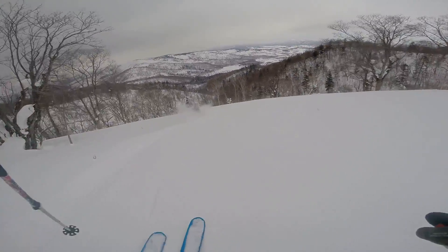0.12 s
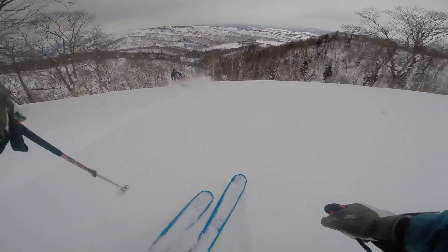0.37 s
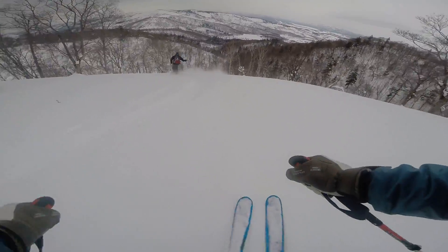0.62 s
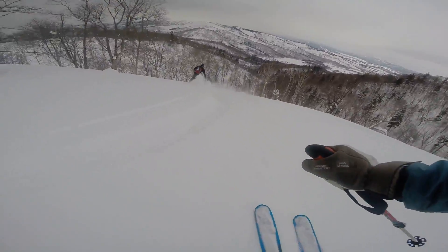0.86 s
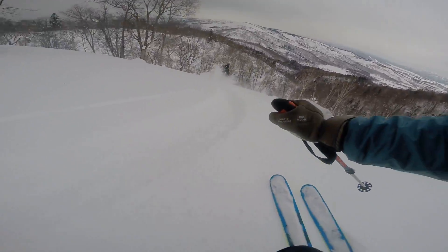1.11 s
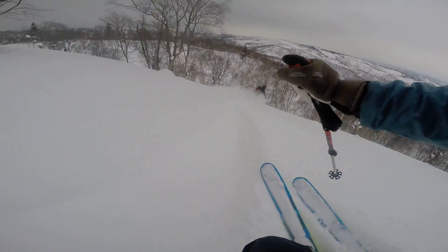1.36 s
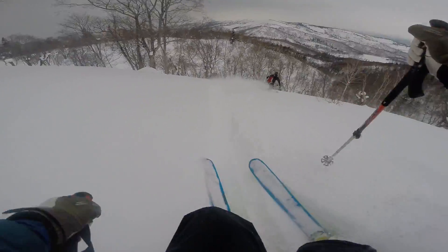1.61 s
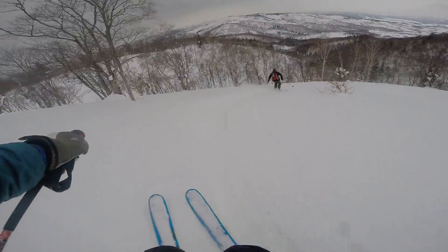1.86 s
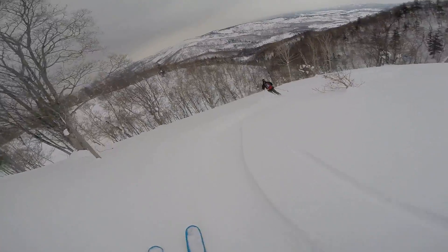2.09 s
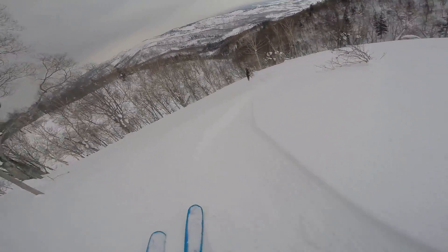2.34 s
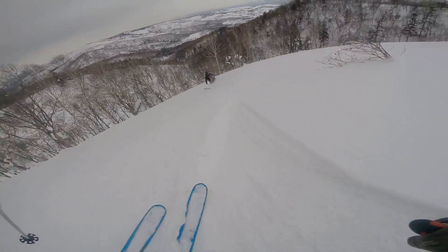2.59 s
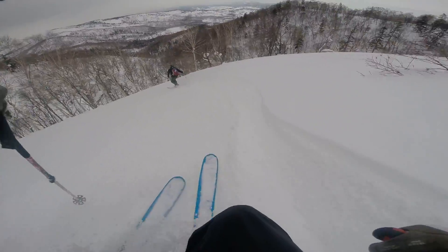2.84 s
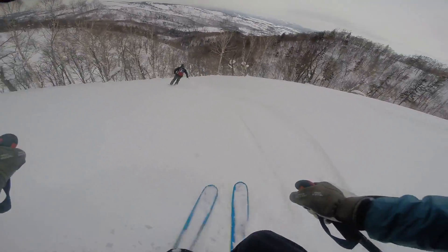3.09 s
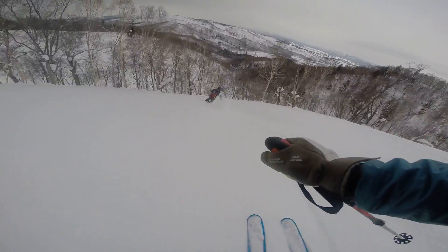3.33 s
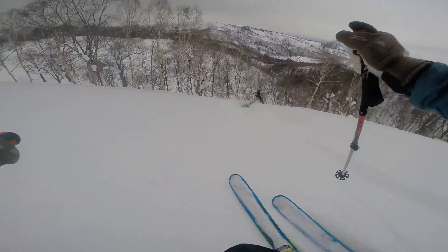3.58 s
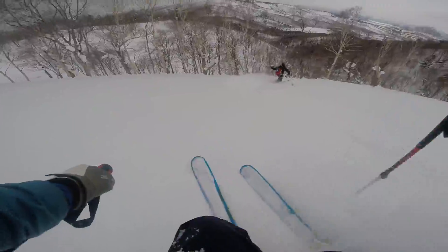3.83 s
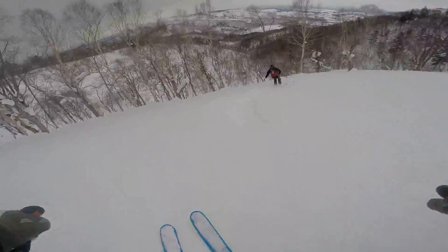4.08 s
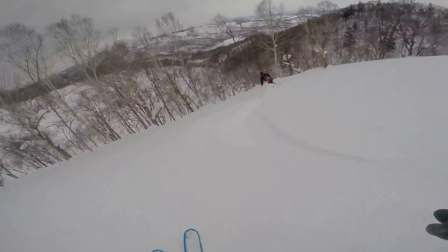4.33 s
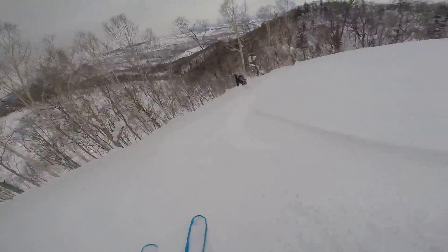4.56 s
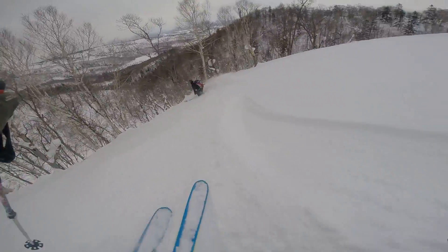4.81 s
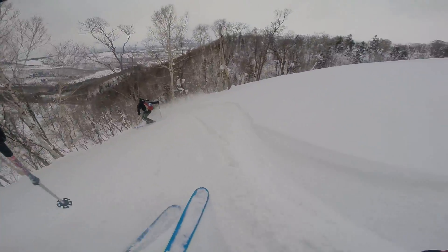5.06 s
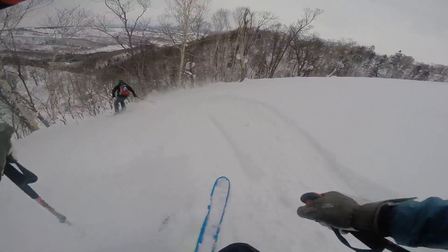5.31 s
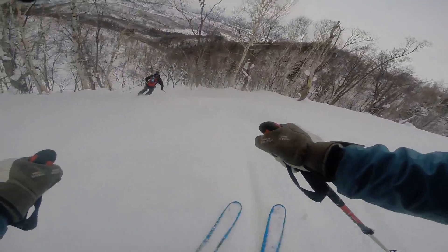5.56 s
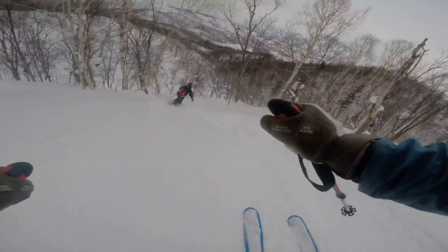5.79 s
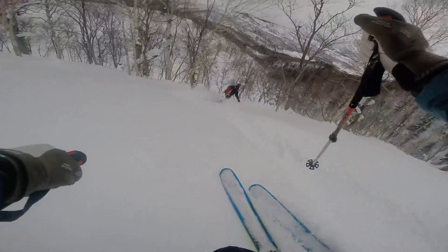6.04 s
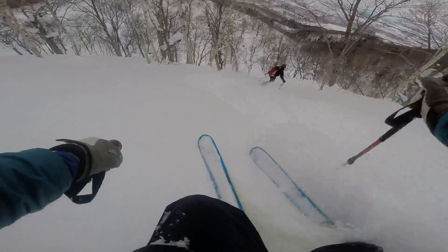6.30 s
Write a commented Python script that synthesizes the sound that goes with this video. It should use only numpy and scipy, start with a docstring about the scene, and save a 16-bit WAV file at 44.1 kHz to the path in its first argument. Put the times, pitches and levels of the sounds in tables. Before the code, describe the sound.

Muffled low wind rumbles unevenly against a closed plastic housing on a skier, over a thin, soft hiss of skis in powder. A bright tick comes at about 0.5 s with a small lurch. From 1.0 to 2.0 s airy gusts flutter past, powder sprays softly, and fine snow crystals crackle on the shell, mostly around 1.3 and 1.5 s. It is calmer from 2.3 s, with a dull thump at 2.6 and another at 3.4. A strong rushing gust swells at 3.55 and ends in a loud, hard plastic knock at 3.6, with a brief rattle. Low wind swells near 4.2, then small squeaky rubs of the mount scatter from 4.3 to 4.9. Short sharp gusts and a rub come at about 5.45, soft thumps at 5.8, and breathy gusts around 6.0 to 6.2, the wind and hiss continuing to the end at 6.4.

```python
"""Wind buffets a closed plastic housing on a skier gliding through powder snow, and rushes through its air cavity.
Wind, ski hiss and powder spray are shaped noise; the hiss and spray pass through the cavity's resonances.
Snow crystals tick on the shell as short cracks with a pitch; the mount rubs (stick-slip), thumps and lurches.
One gust ends in a hard knock: a push, decaying shell modes, a rattle and a slow swing."""
import sys
import numpy as np
from scipy import signal
from scipy.fft import rfft, irfft, next_fast_len
from scipy.io import wavfile
from scipy.ndimage import uniform_filter1d, map_coordinates

SR = 44100
rng = np.random.default_rng(int(sys.argv[2]) if len(sys.argv) > 2 else 0)


def gain_from_db(level_db):
    """Turn a decibel level (scalar or array-like) into a linear amplitude factor."""
    decades = np.asarray(level_db, float) / 20
    return 10 ** decades


def materialize(psi):
    """Save the field psi as 16-bit PCM at rate SR to the path in sys.argv[1].

    A 1-D psi becomes a single channel; in a 2-D psi each row is a channel.
    """
    bounded = np.clip(np.atleast_2d(psi).T, -1, 1)
    quanta = np.round(bounded * 32767).astype(np.int16)
    wavfile.write(sys.argv[1], SR, quanta)


N = 283061  # samples

# wind buffeting the housing: (time [s], rms [dB])
WIND = [(0.0, -31), (0.36, -37), (0.53, -32), (0.75, -34.5), (2.95, -32), (3.13, -33.5), (3.41, -35),
        (3.63, -28), (3.86, -35.5), (4.15, -21), (4.34, -39), (5.38, -33), (5.52, -43.5), (5.74, -37),
        (5.93, -27), (6.42, -35.5)]
# relative colours of buffet, rocking, flutter and rush: (frequency [Hz], density [dB per Hz])
BUFFET_COLOUR = [(8, -6.5), (20, 3), (45, -8.5), (150, -21), (500, -48.5)]
ROCKING_COLOUR = [(12, -9), (30, -0.5), (70, -2.5), (130, -10.5), (250, -29.5)]
FLUTTER_COLOUR = [(80, -9), (200, 0), (450, -7.5), (800, -14), (1300, -14), (2000, -27), (3600, -28)]
RUSH_COLOUR = [(800, -18.5), (1400, -13.5), (1900, -0.5), (2380, -0.5), (2750, -13.5), (3600, -19),
               (4200, -20)]
# hiss of the skis, louder as the edges press: (time [s], rms [dB])
GLIDE = [(0.0, -52.5), (0.18, -53), (0.52, -48.5), (0.84, -55), (1.77, -49), (2.0, -55), (2.34, -55.5),
         (2.88, -50.5), (3.34, -54.5), (3.65, -48.5), (3.98, -50.5), (4.27, -54), (5.68, -53.5),
         (5.93, -52), (6.27, -52), (6.42, -49)]
# air cavity before the microphone: (resonance [Hz], width [Hz], level [dB])
CAVITY = [(1623, 110, 2.5), (2330, 294, 3), (3540, 640, -9.5), (4610, 756, -7), (6530, 930, -11.5),
          (9500, 1620, -16)]
# gusts on the housing: (start [s], end [s], rush strength [dB], shaking over blowing [dB])
GUSTS = [(0.296, 0.433, -56, 8), (0.553, 0.601, -43.5, 2.5), (0.655, 0.783, -53.5, 7),
         (1.01, 1.067, -45.5, -1.5), (1.092, 1.148, -47, -4), (1.263, 1.387, -47, -4),
         (1.533, 1.597, -43, -10), (1.691, 1.935, -49.5, -2), (1.972, 2.017, -48, -2.5),
         (2.258, 2.329, -50.5, 3), (3.052, 3.126, -55, 7), (3.466, 3.545, -40.5, -1.5),
         (3.561, 3.621, -24.5, -3.5), (3.66, 3.9, -53.5, -0.5), (3.926, 4.046, -42.5, -3),
         (4.05, 4.176, -42.5, -6), (4.447, 4.5, -49.5, -4), (4.544, 4.572, -53.5, 11),
         (5.18, 5.262, -51, 7), (5.26, 5.36, -48, 4.5), (5.444, 5.466, -32.5, 1.5),
         (5.473, 5.497, -33, 3.5), (5.725, 5.85, -46, 1.5), (5.964, 5.99, -35, 1.5),
         (5.998, 6.027, -31, 1.5), (6.049, 6.121, -41.5, -3), (6.165, 6.232, -37.5, -6),
         (6.335, 6.418, -48.5, -10)]
# powder thrown up by the skis, striking and fading: (start [s], level [dB], t60 [s])
CLOUDS = [(0.33, -54, 0.37), (1.288, -46, 0.34), (1.537, -38.5, 0.19), (1.733, -51, 0.3), (3.597, -41, 0.1)]
# brief rubs of the mount: (start [s], ring rms [dB], pitch [Hz], length of slipping [s])
RUBS = [(0.276, -47.5, 730, 0.024), (0.66, -48, 520, 0.024), (1.107, -48, 490, 0.037),
        (1.538, -43.5, 2330, 0.043), (1.796, -48, 910, 0.0083), (2.553, -51, 714, 0.028),
        (2.957, -43, 287, 0.0081), (3.601, -32.5, 1010, 0.016), (4.293, -50, 2200, 0.015),
        (4.358, -55, 3380, 0.024), (4.444, -45, 1770, 0.012), (4.482, -43.5, 1970, 0.014),
        (4.479, -47, 885, 0.016), (4.534, -48, 510, 0.031), (4.651, -48.5, 423, 0.018),
        (4.707, -48, 2100, 0.018), (4.7, -49, 836, 0.016), (4.861, -46.5, 2190, 0.021),
        (4.872, -52, 750, 0.024), (5.285, -39.5, 1170, 0.0058), (5.303, -50.5, 1230, 0.067),
        (5.46, -33.5, 1690, 0.008)]
# snow crystals on the shell: (time [s], level [dB], pitch [Hz])
TICKS = [(0.496, -21.5, 7050), (1.257, -40, 11000), (1.264, -33, 6900), (1.2917, -30, 9600),
         (1.3, -27.5, 9000), (1.3003, -27, 5000), (1.305, -28, 11300), (1.3312, -27.5, 9050),
         (1.3366, -27.5, 5000), (1.516, -28, 2400), (1.516, -27.5, 9800), (1.5405, -25, 2300),
         (1.543, -21, 4940), (1.6188, -29, 11200), (1.735, -26.5, 6800), (1.757, -29, 7000),
         (1.8542, -33.5, 7150)]
# swings of the housing on its mount: (start [s], peak [dB], pitch [Hz], length [s])
LURCHES = [(0.521, -18, 18.5, 0.084), (1.515, -17.5, 28.5, 0.036), (1.279, -22, 45, 0.047),
           (1.359, -22, 18.5, 0.039), (3.47, -16.5, 54, 0.018), (3.5, -18.5, 75, 0.02),
           (3.761, -16.5, 22, 0.04), (4.105, -20, 65, 0.06), (6.058, -20, 60, 0.015),
           (6.092, -20.5, 46, 0.026)]
# dull pushes of the mount: (start [s], level [dB], time to zero crossing [s])
THUMPS = [(1.516, -20, 0.003), (2.64, -13, 0.0018), (3.431, -11, 0.0036), (3.707, -20, 0.0024),
          (4.22, -20, 0.0066), (5.7745, -21, 0.0015), (5.804, -17, 0.0026)]
# the hard knock: (start [s], level [dB])
KNOCK = (3.6215, -1.4)
# shell modes in the knock: (pitch [Hz], level over the push [dB], t60 [s], rise [s])
SHELL_MODES = [(438, -18, 0.058, 0.00078), (1850, 20, 0.0105, 0.0056), (2960, -1.5, 0.0081, 0.00087),
               (4470, -13, 0.0053, 0.00012)]

RISE_S, FALL_S = 0.047, 0.039
KNOCK_RISE_S = 0.063  # slower rise of the gust that ends in the knock
USUAL_GUST_DB, POWDER_DB = -44, -55.5  # strength of a usual gust, and its powder
POWDER_DB_PER_DB = 0.82  # growth with gust strength
STEADY_FLUTTER_DB, FLUTTER_DB_PER_DB = -51.5, 0.082  # in mean wind, and growth with wind
ROCKING_OVER_SHAKING_DB, ROCKING_SMOOTHING_S = 9, 0.03
ROCKING_MAX_RMS = 0.058  # the mount stops the swing
KNOCK_TOP_HZ = 6200  # the padded mount dulls the blow above this
TOP_HZ = 15600


def unit(x):
    """Scaled to rms 1."""
    return x / np.sqrt(np.mean(x ** 2) + 1e-20)


def curves(rows):
    """One value per sample for each column after the time."""
    time_s, *columns = np.transpose(rows)
    return [np.interp(np.arange(N) / SR, time_s, column) for column in columns]


def wobble(rate_hz):
    """Smooth random curve, rate_hz knots a second."""
    knots = rng.standard_normal(round(N * 2 * rate_hz / SR) + 9)
    return map_coordinates(knots, [np.arange(N) * rate_hz / SR])


def noise():
    """White noise, rms about 1."""
    return rng.standard_normal(N)


def filtered(x, response):
    """x times a real or complex response of frequency."""
    size = next_fast_len(N + 8192)
    return irfft(rfft(x, size) * response(np.fft.rfftfreq(size, 1 / SR)), size)[:N]


def coloured(x, spectrum):
    """x through (frequency [Hz], level [dB]) points read on a log axis, rms 1."""
    point_hz, point_db = np.transpose(spectrum)

    def response(hz):
        return gain_from_db(np.interp(np.log(hz + 1), np.log(point_hz), point_db, left=-80, right=-80))

    return unit(filtered(x, response))


def patchy(patch_db):
    """White noise with patches of random gain in time and frequency; patch_db is their rms."""
    bins = signal.stft(rng.standard_normal(N + 512), nperseg=512)[2]
    field = uniform_filter1d(rng.standard_normal(bins.shape), size=6, axis=0)
    field = uniform_filter1d(field, size=8, axis=1)
    return signal.istft(bins * gain_from_db(patch_db * unit(field)), nperseg=512)[1][:N]


def cavity(hz):
    """Summed resonances of the air cavity, alternating in sign, over a weak direct path."""
    response = gain_from_db(-29.0)
    for k, (centre_hz, width_hz, db) in enumerate(CAVITY):
        damping = 1j * hz * width_hz
        response = response + (-1) ** k * gain_from_db(db) * damping / (centre_hz ** 2 - hz ** 2 + damping)
    return response


def add(track, start_s, sound):
    """Mixes a short sound in at start_s."""
    track[round(start_s * SR):][:len(sound)] += sound


def ease(u):
    """Smooth step from 0 to 1."""
    return np.sin(np.pi / 2 * np.clip(u, 0, 1)) ** 2


def wind(rush_gain, flutter_gain):
    """Eddies push the housing (buffet), rock it, shake it (flutter) and blow across the cavity in lumps (rush)."""
    wind_db, = curves(WIND)
    eddies = wobble(30)
    buffet = unit(coloured(gain_from_db(2.94 * wobble(14) + 2.9 * eddies) * noise(), BUFFET_COLOUR))
    rocking = unit(coloured(gain_from_db(2.6 * eddies) * noise(), ROCKING_COLOUR))
    flutter = unit(gain_from_db(1.7 * eddies + 2.07 * wobble(90)) * coloured(patchy(2.5), FLUTTER_COLOUR))
    rush = unit(gain_from_db(0.59 * eddies + 2.57 * wobble(120)) * coloured(patchy(2.5), RUSH_COLOUR))

    shaking = uniform_filter1d(flutter_gain, size=round(ROCKING_SMOOTHING_S * SR))
    rocking_gain = ROCKING_MAX_RMS * np.tanh(gain_from_db(ROCKING_OVER_SHAKING_DB) * shaking / ROCKING_MAX_RMS)
    steady_gain = gain_from_db(STEADY_FLUTTER_DB + FLUTTER_DB_PER_DB * (wind_db - wind_db.mean()))
    all_flutter_gain = np.hypot(flutter_gain, steady_gain)
    return gain_from_db(wind_db) * buffet + rocking_gain * rocking + all_flutter_gain * flutter + rush_gain * rush


def glide():
    """Powder sliding under the skis: a smooth hiss heard through the cavity."""
    hiss = unit(filtered(patchy(1.3), cavity))
    level_db = curves(GLIDE)[0] + 0.76 * wobble(8.9) + 1.27 * wobble(40)
    return gain_from_db(level_db) * hiss


def gusts():
    """Gain envelopes (rush, flutter, spray): gusts rise, hold and fall; powder clouds strike and decay."""
    gains = np.zeros((3, N + SR))
    for start_s, end_s, db, shake_db in GUSTS:
        rise_s = KNOCK_RISE_S if start_s < KNOCK[0] < end_s + .03 else RISE_S
        t = np.arange(round((end_s - start_s + 0.04) * SR)) / SR
        shape = ease(t / rise_s) * ease((t[-1] - t) / FALL_S)
        powder_db = POWDER_DB + POWDER_DB_PER_DB * (db - USUAL_GUST_DB)
        levels = gain_from_db([db, db + shake_db, powder_db])
        add(gains.T, start_s - .02, np.outer(shape, levels))
    t = np.arange(SR // 2) / SR
    for start_s, db, t60_s in CLOUDS:
        add(gains[2], start_s, gain_from_db(db - 60 * t / t60_s) * ease(t / 0.005))
    return gains[:, :N]


def spray(gain):
    """Powder thrown on the shell: dense grains of unequal size, through the cavity."""
    size_gain = gain_from_db(2.3 * np.minimum(rng.exponential(size=N), 3))
    grains = (rng.random(N) < .15) * noise() * size_gain

    def treble(hz):
        low_cut = (hz / 3600) ** 3 / (1 + (hz / 3600) ** 3)
        return cavity(hz) * low_cut / (1 + (hz / 10000) ** 3)

    return gain * unit(filtered(grains, treble))


def rubs():
    """Stick-slip: a swell of irregular slips rings near one pitch, over grit strongest at the first catch."""
    track = np.zeros(N + SR)
    for start_s, db, hz, length_s in RUBS:
        t = np.arange(round(np.clip(length_s, .005, .08) * SR)) / SR
        slips = rng.standard_normal(len(t)) * np.hanning(len(t)) ** 0.3
        ring = signal.fftconvolve(slips, np.sin(2 * np.pi * hz * t) * t * np.exp(-t / 0.00071))
        grit = uniform_filter1d(slips, size=8) * (np.exp(-t / 0.0016) + .3)
        add(track, start_s, gain_from_db(db) * unit(ring))
        add(track, start_s, gain_from_db(db + 3) * grit)
    return track[:N]


def ticks():
    """Each crystal cracks with a few cycles at its pitch; six weaker ones shower around each listed one."""
    track, t = np.zeros(N + SR), np.arange(256) / SR
    chance = rng.random((len(TICKS), 6, 3))
    # shower: -20 to 50 ms, 11 to 21 dB weaker, 5 to 13 kHz
    shower = np.array(TICKS)[:, None] * [1, 1, 0] + chance * [.07, -10, 8000] + [-.02, -11, 5000]
    for time_s, db, hz in [*TICKS, *shower.reshape(-1, 3)]:
        crack = 0.36 * np.diff(rng.standard_normal(len(t) + 1)) * gain_from_db(-60 * t / 0.002)
        ring = np.sin(2 * np.pi * hz * t) * gain_from_db(-60 * t / 0.0038)
        add(track, time_s, gain_from_db(db) * (ring + crack) * (1 - np.exp(-t / 0.00017)))
    return track[:N]


def lurches():
    """The housing swings slowly on its mount; each swing swells and settles."""
    track = np.zeros(N + SR)
    for start_s, db, hz, length_s in LURCHES:
        t = np.arange(round(length_s * SR)) / SR
        add(track, start_s, gain_from_db(db) * np.sin(2 * np.pi * hz * t) * np.hanning(len(t)) ** .5)
    return track[:N]


def thumps():
    """A quick push of the mount and a slower swing back, without ringing."""
    track, t = np.zeros(N + SR), np.arange(SR // 20) / SR
    for start_s, db, length_s in THUMPS:
        u = t / length_s
        add(track, start_s, gain_from_db(db) * (1 - np.exp(-t / 0.00074)) * (1 - u) * np.exp(-.6 * u))
    return track[:N]


def knock():
    """Short inward push, shell modes of wavering level, a rough rattle, then a slow swing of the housing."""
    track, t = np.zeros(N + SR), np.arange(SR // 20) / SR
    start_s, db = KNOCK

    def hump(delay_s, length_s):
        return np.sin(np.pi * np.clip((t - delay_s) / length_s, 0, 1))

    push = hump(0, 0.0009) ** 2.4
    ring = np.zeros(len(t))
    for hz, mode_db, t60_s, rise_s in SHELL_MODES:
        decay = gain_from_db(mode_db - 60 * t / t60_s)
        ring += decay * np.sin(2 * np.pi * hz * t) * (1 - np.exp(-(t / rise_s) ** 3))
    waver = unit(np.convolve(rng.standard_normal(len(t)), np.hanning(70), "same"))
    ring *= gain_from_db(1.5 * waver)
    rattle_band = signal.butter(3, [600, 3600], "band", fs=SR)
    rattle = signal.lfilter(*rattle_band, rng.standard_normal(len(t)))
    rattle *= 0.5 * gain_from_db(-60 * t / 0.043) * hump(0, 0.0069)
    swing = .27 * hump(.007, .011) ** 1.1
    add(track, start_s, -gain_from_db(db) * (push + ring + rattle + swing))
    return signal.lfilter(*signal.butter(4, KNOCK_TOP_HZ, fs=SR), track[:N])


def scene():
    """All sources reach one microphone inside the housing."""
    rush_gain, flutter_gain, spray_gain = gusts()
    air_and_snow = wind(rush_gain, flutter_gain) + glide() + spray(spray_gain) + ticks()
    mount = rubs() + lurches() + thumps() + knock()
    return (air_and_snow + mount)[None]


def roll_off(x):
    """The treble ends steeply here."""
    return signal.sosfilt(signal.butter(12, 15810, fs=SR, output="sos"), x)


def record(dry):
    """Cuts everything from TOP_HZ up and finishes the mix."""
    mix = filtered(dry[0], lambda hz: hz < TOP_HZ)[None]
    return roll_off(mix)


dry = scene()
out = record(dry)
materialize(out)
```